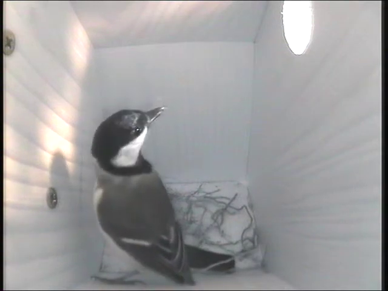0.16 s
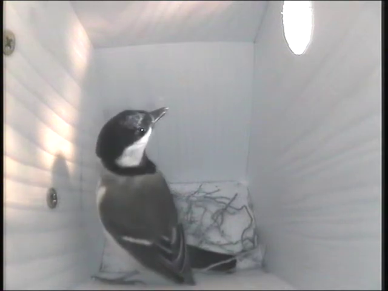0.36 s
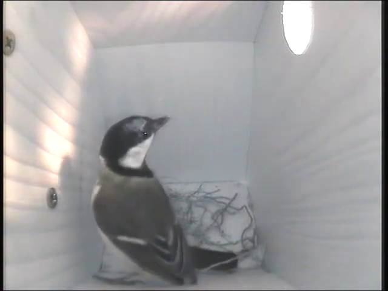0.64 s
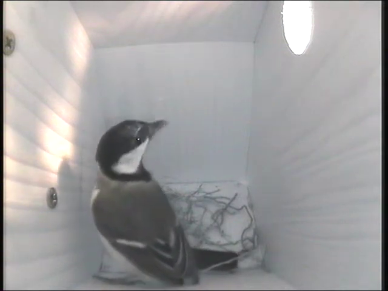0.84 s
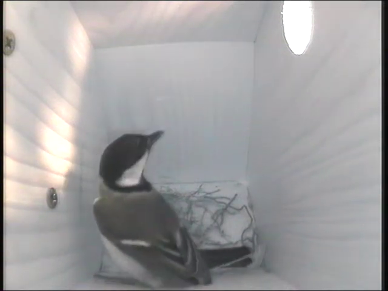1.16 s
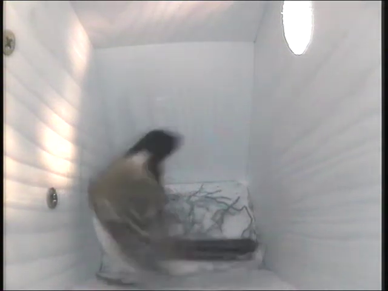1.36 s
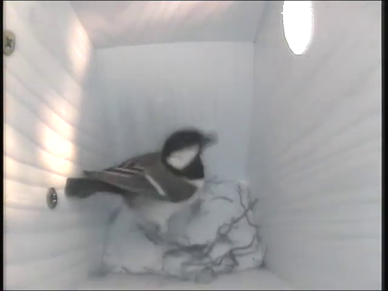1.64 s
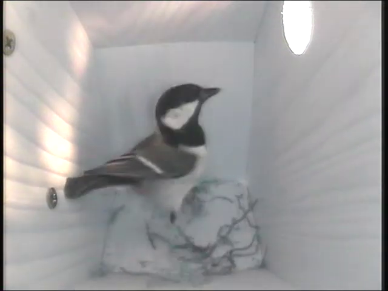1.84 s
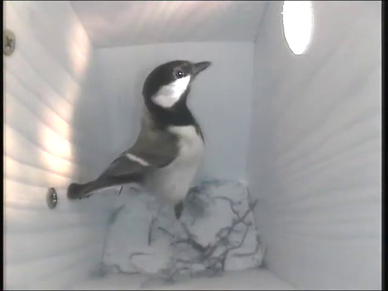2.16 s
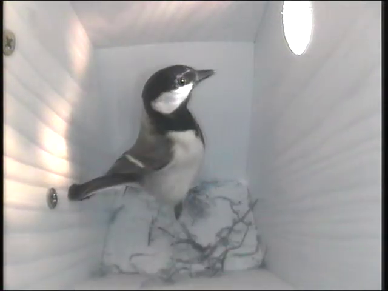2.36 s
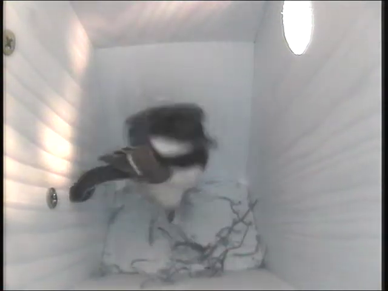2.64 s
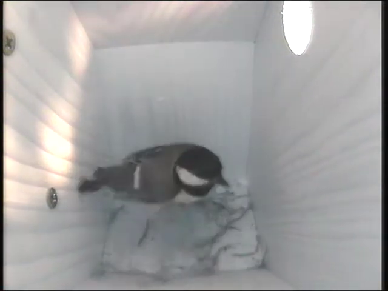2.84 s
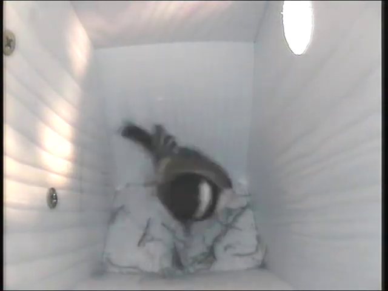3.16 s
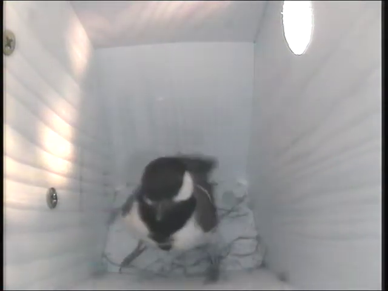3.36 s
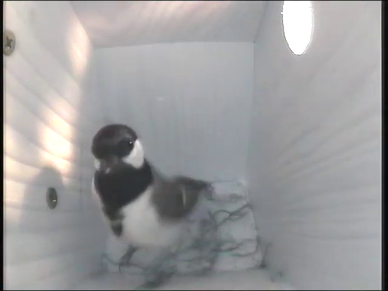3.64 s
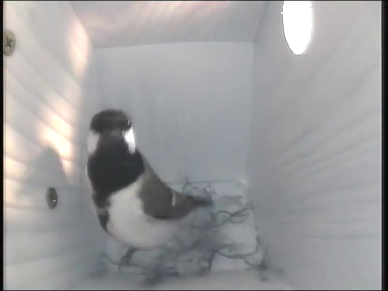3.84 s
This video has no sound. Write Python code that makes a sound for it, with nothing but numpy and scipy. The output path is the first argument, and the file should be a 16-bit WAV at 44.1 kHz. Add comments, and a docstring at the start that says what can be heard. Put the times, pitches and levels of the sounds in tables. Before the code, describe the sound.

A small bird calls in very high, thin, breathy falling warbles: four quickly from 0 to 0.65 seconds, then at 0.8 and 1.1. Feet knock and scuffle on hollow wood at 1.4-2.0; faint calls follow at 2.0, 2.3 and 2.7. Stronger hops, scrapes and flutters run 2.7-3.9. A muffled dove coos around 1.0, 1.6-1.9 and the end. Rumble, hiss, intermittent whine; right-sided, brief dropout at 1.2.

```python
"""Small bird in a wooden nest box

Thin, warbling, mostly falling calls are swept sines with breath noise, low partials and chips under them.
Hops, scratches and flutters are noise bursts and grains coloured by resonances of the box and its wall.
Air puffs ring the hollow, and a dove coos outside as a low swept sine. Rumble, hum and hiss lie beneath.
A very high whine sounds around the calls; the right channel carries nearly everything and drops out once."""
import sys
import numpy as np
from scipy import signal
from scipy.io import wavfile
from scipy.ndimage import uniform_filter1d

SR = 44100
rng = np.random.default_rng(int(sys.argv[2]) if len(sys.argv) > 2 else 0)


def pcm_store(signal):
    """Save signal as 16-bit PCM."""
    levels = np.round(np.clip(np.atleast_2d(signal), -1, 1) * 32767)
    wavfile.write(sys.argv[1], SR, levels.astype(np.int16).T)


N = 176400  # samples, 4 s

# All source levels are stated ahead of the channel gains in scene().
# Whistle of the bird, one list per call: [t/s, f/Hz, level/dB]
CALL_CURVES = [
    [(0.006, 8940, -43), (0.016, 8660, -35.5), (0.022, 9210, -23), (0.032, 9300, -53), (0.036, 9100, -38),
     (0.042, 8900, -32), (0.046, 8970, -31), (0.052, 8600, -29), (0.057, 9150, -25), (0.064, 8540, -31),
     (0.076, 8680, -23.5), (0.08, 8370, -20), (0.086, 9200, -32), (0.091, 8700, -34), (0.102, 8520, -31.5),
     (0.116, 8210, -34), (0.12, 7720, -49), (0.135, 8069, -92)],
    [(0.16, 9300, -63), (0.17, 8730, -35.5), (0.176, 9250, -27.5), (0.184, 9210, -45), (0.198, 8800, -30.5),
     (0.208, 9120, -27.5), (0.224, 8576, -23.5), (0.27, 8470, -39.5), (0.288, 8300, -56),
     (0.298, 8240, -34.5), (0.311, 8210, -33.5), (0.318, 7840, -48), (0.328, 8150, -66)],
    [(0.365, 8900, -76), (0.374, 9070, -34.5), (0.383, 9310, -22.5), (0.39, 9100, -61), (0.395, 9130, -32),
     (0.407, 8800, -33), (0.413, 8800, -30), (0.42, 8760, -28), (0.424, 9070, -23), (0.429, 8470, -20),
     (0.434, 8940, -34), (0.443, 8630, -24.5), (0.49, 8290, -48.5), (0.496, 8020, -33.5), (0.5, 7670, -55),
     (0.515, 8060, -70)],
    [(0.54, 8900, -54), (0.546, 8860, -41), (0.552, 8570, -40), (0.561, 9300, -31), (0.566, 8900, -46.5),
     (0.572, 8600, -30), (0.583, 9400, -36), (0.592, 8500, -35), (0.614, 8620, -27), (0.626, 8960, -44),
     (0.636, 7780, -49.5), (0.648, 8140, -99)],
    [(0.817, 9460, -59), (0.823, 9200, -33.5), (0.83, 9470, -40), (0.842, 9060, -29), (0.866, 8750, -35.5),
     (0.886, 8630, -29.5), (0.914, 8370, -44), (0.93, 8800, -79)],
    [(1.065, 9400, -86.5), (1.069, 9300, -41.5), (1.075, 9080, -43.5), (1.109, 8710, -32.5),
     (1.121, 8530, -42.5), (1.145, 8480, -36.5), (1.155, 8570, -43), (1.172, 8740, -94)],
    [(2.015, 9600, -57), (2.023, 8900, -50), (2.045, 8720, -65), (2.079, 8731, -48), (2.109, 8740, -49.5),
     (2.115, 8870, -60.5), (2.125, 8569, -81)],
    [(2.32, 9400, -64), (2.324, 9350, -60), (2.342, 8990, -44.5), (2.348, 9000, -55), (2.354, 9120, -45),
     (2.364, 8810, -48), (2.406, 8730, -45.5), (2.414, 8590, -49), (2.425, 8610, -98)],
    [(2.69, 9040, -41), (2.702, 9400, -77), (2.708, 9100, -45), (2.722, 9181, -46), (2.73, 8760, -47),
     (2.746, 9120, -41.5), (2.752, 8550, -43), (2.764, 9060, -51), (2.778, 8600, -39.5), (2.8, 8600, -73)],
    [(3.965, 9381, -106), (3.977, 9339, -69), (4.0, 9400, -45)],
]
# Instants at which the whistle catches: [t/s]
CATCH_TIMES = [0.0555, 0.0615, 0.081, 0.089, 0.204, 0.208, 0.216, 0.381, 0.409, 0.421, 0.426, 0.431, 0.437,
               0.828, 0.846, 0.864, 0.87]
# Lower second voice under some calls, one list each: [t/s, f/Hz, level/dB]
LOW_VOICE = [
    [(0.298, 7280, -57), (0.306, 6400, -43), (0.313, 5570, -50)],
    [(0.545, 5400, -61), (0.549, 5410, -45.5), (0.625, 5520, -66.5)],
    [(0.83, 5480, -62), (0.858, 5410, -52), (0.915, 5700, -59)],
    [(1.075, 5385, -55), (1.141, 5570, -49), (1.165, 5720, -65)],
    [(2.04, 5080, -58), (2.106, 5340, -47), (2.12, 5600, -59.5)],
    [(2.325, 5050, -61.5), (2.407, 5450, -48), (2.42, 5500, -75)],
    [(2.7, 5340, -68), (2.738, 5510, -73), (2.79, 5240, -49.5)],
    [(3.965, 5220, -52.5), (3.991, 4930, -67), (4.0, 5480, -48)],
]
# Lower partials late in the second call: [t/s, f/Hz, level/dB]
UNDERTONE = [
    [(0.27, 2890, -63), (0.287, 2750, -65), (0.305, 2810, -62)],
    [(0.27, 5470, -69.5), (0.287, 5560, -54), (0.305, 5260, -52)],
]
# Breath under each call: [start t/s, end t/s, mean level/dB]
BREATHS = [(0.008, 0.126, -52.5), (0.165, 0.269, -52), (0.268, 0.296, -63), (0.294, 0.323, -55.5),
           (0.372, 0.506, -54), (0.543, 0.626, -55), (0.819, 0.914, -60), (1.087, 1.144, -54.5),
           (2.02, 2.119, -55), (2.316, 2.406, -66.5), (2.678, 2.817, -61), (3.974, 4.005, -68)]
# Resonances heard in the breath: [f/Hz, width/Hz, relative level/dB]
THROAT = [(517, 40, 0.5), (1178, 130, -6), (2244, 47, 2), (2790, 160, -14.5), (3320, 120, -7),
          (5420, 105, 8), (6350, 620, -4), (6790, 88, 8.5), (8810, 660, -8.5)]
# Short chips closing the first calls: [t/s, level before roughening/dB, f/Hz]
CHIPS = [(0.1173, -27.5, 5530), (0.3112, -32, 5730), (0.4968, -34, 5630), (0.629, -31.5, 5560)]
# Puffs of air driving the hollow: [t/s, peak level/dB]
PUFFS = [(0.001, -39.5), (0.114, -40.5), (0.152, -37.5), (0.303, -38.5), (0.36, -40.5), (0.491, -40),
         (0.529, -40), (0.628, -43), (0.805, -41.5), (1.053, -49), (1.573, -40), (2.668, -45.5),
         (2.814, -42.5), (3.683, -55), (3.948, -47.5)]
# Feet, beak and wings on the wood: [t/s, drive level/dB, treble relative to dull drive/dB, nominal fade/s]
KNOCKS = [(0.167, -47.5, -15, 0.01), (0.657, -48, -4, 0.013), (0.823, -46, -19, 0.015),
          (1.059, -44.5, -13, 0.024), (1.268, -48, 10, 0.014), (1.409, -46, 8, 0.036),
          (1.458, -32, -5, 0.012), (1.485, -30.5, 7.5, 0.0046), (1.561, -30.5, 5.5, 0.013),
          (1.584, -27.5, 5.5, 0.015), (1.625, -34.5, -5, 0.0082), (1.648, -37.5, 3.5, 0.013),
          (1.725, -35, -11.5, 0.011), (1.816, -38.5, 5, 0.0079), (1.987, -40.5, 7.5, 0.013),
          (2.682, -46, -5.5, 0.012), (2.744, -39, 9, 0.014), (2.793, -28.5, 7, 0.0088),
          (2.808, -31, 4, 0.0067), (2.921, -23, -14, 0.0058), (2.98, -18.5, -1.5, 0.0077),
          (2.996, -43.5, -1, 0.01), (3.061, -45, -6, 0.015), (3.231, -36.5, -6.5, 0.0052),
          (3.25, -34, -13, 0.0077), (3.338, -39.5, 15.5, 0.0036), (3.362, -21, 0, 0.0085),
          (3.412, -23.5, -2, 0.0052), (3.558, -42.5, -13.5, 0.0076), (3.586, -39.5, -1, 0.0076),
          (3.64, -42.5, -6, 0.018), (3.668, -43, 14.5, 0.0073), (3.722, -30, 2.5, 0.0072),
          (3.736, -33.5, -12, 0.014), (3.776, -39.5, 9, 0.0041), (3.842, -45, -10, 0.0064),
          (3.917, -37.5, -6, 0.0092)]
# Claws scraping the wall: [t/s, drive level/dB, nominal fade/s]
SCRAPES = [(2.745, -36.5, 0.0066), (2.769, -27, 0.012), (2.795, -33, 0.011), (2.982, -44, 0.0078),
           (3.445, -41, 0.0082)]
# Resonances of the scraped wall: [f/Hz, width/Hz, relative level/dB]
SCRAPE_RING = [(2106, 137, 3.5), (3420, 260, -24)]
# Shuffling: [t/s, feet level/dB, feather and straw level/dB], each level taken within a reference band
SHUFFLE = [(0.0, -53.5, -91), (0.09, -118, -64), (0.22, -98, -109), (0.42, -65, -102), (0.62, -68, -90),
           (0.85, -76, -91.5), (1.18, -65.5, -75.5), (1.35, -63, -77.5), (1.48, -51.5, -60),
           (1.63, -47.5, -68), (1.67, -62.5, -86), (1.8, -52.5, -65.5), (1.96, -60.5, -77.5),
           (2.09, -49.5, -93.5), (2.35, -96, -70), (2.6, -77, -99), (2.74, -48.5, -59.5),
           (2.86, -50.5, -71), (2.92, -52, -64), (2.96, -44.5, -62), (3.07, -57.5, -75),
           (3.15, -68.5, -83.5), (3.3, -48, -62), (3.44, -47.5, -63.5), (3.56, -64.5, -100),
           (3.69, -50, -64), (3.87, -64, -91), (4.0, -52, -65)]
# Resonances of the box: [f/Hz, width/Hz, mean relative level/dB]
BOX = [(111, 19.6, 0.5), (235.4, 31, -2), (397, 29.5, -0.5), (520, 46, 4), (685, 210, -8.5), (812, 47, 0),
       (909.6, 41, -0.5), (972, 33.4, 0.5), (1115, 41, 0), (1308, 51.6, -3.5), (1513, 180, -23.5),
       (2203, 80, -7.5), (2844, 170, -19), (3375, 95, -4), (3890, 2900, -25), (5244, 163, -8.5),
       (5467, 75, -9), (5870, 720, -18.5), (6824, 224, -10.5), (8960, 690, -19), (11740, 740, -21)]
# Dove outside, one list per coo: [t/s, f/Hz, level/dB]
COOS = [
    [(0.93, 393, -73), (0.958, 405, -57), (0.992, 457, -51.5), (1.058, 457, -54.5), (1.072, 508, -43.5),
     (1.09, 520, -80)],
    [(1.55, 513, -72), (1.586, 505, -52), (1.694, 514, -44.5), (1.834, 501, -45), (1.894, 448, -55),
     (1.93, 393, -78.5)],
    [(3.93, 426, -66), (3.96, 444, -51), (4.0, 440, -57)],
]
# Spans of the high whine: [start t/s, end t/s]
WHINE_SPANS = [(0.0, 0.138), (0.157, 0.33), (0.349, 0.522), (0.541, 0.641), (0.828, 0.93), (1.068, 1.168),
               (2.005, 2.13), (2.318, 2.42), (2.702, 2.8)]

WARBLE_HZ, WARBLE_RATE_HZ = 39.3, 150  # rms pitch deviation and its bandwidth
ROUGH, ROUGH_RATE_HZ = .07, 600  # rms share of level fluctuation and its bandwidth
LOW_WARBLE_HZ, LOW_ROUGH = 77, 0.11
CATCH_WIDTH_S = 0.0021
BREATH_CUT_HZ, BREATH_PATCHY_DB = 9900, 3
ECHO_S, ECHO_T60_S, ECHO_DB = [.0017, .0031, .0047], .025, -16
CHIP_T60_S, CHIP_RISE_S, CHIP_FLICK_HZ, CHIP_ROUGH = .012, .001, -500, .45
HOLLOW_HZ, HOLLOW_T60_S, PUFF_RISE_S = 120.2, 0.12, 0.0025
KNOCK_RISE_SHARE = .45  # rise time constant as a share of the fade
KNOCK_LOW_HZ, KNOCK_CUT_HZ, KNOCK_TOP_HZ = 580, 1570, 5980
BOX_SHIFT_DB, BOX_SHIFTS_PER_S = 4, 25
GRAINS_PER_S, GRAIN_SPREAD_DB = 2000, 3.5
FEET_CUT_HZ, RUSTLE_LOW_HZ, RUSTLE_CUT_HZ = 1250, 1840, 8900
RUMBLE_DB, RUMBLE_CUT_HZ, SUB_DB, SUB_CUT_HZ = -61.5, 130, -68, 74
HUM_DB, HUM_WIDTH_HZ = -61, 22
HISS_DB, HISS_CUT_HZ, PULSE_HZ, PULSE_DEPTH_DB = -82.5, 12800, 50.4, 5
WHINE_HZ, WHINE_DB, FUZZ_DB = 15625, -45.5, -30.5  # fuzz is relative to the tone
RIGHT_DB, LEFT_HISS_DB, CROSSTALK_DB = 7.5, -93, -49.5
DROPOUT_START_S, DROPOUT_END_S, CUTOFF_HZ = 1.199, 1.246, 16800


def amp(db):
    """Decibel law: amplitude ratio from a level."""
    return 10 ** (np.asarray(db) / 20)


def rms_one(x):
    """Normalisation of power: rms 1."""
    return x / np.sqrt(np.mean(x ** 2) + 1e-20)


def in_time(rows):
    """Linear interpolation: table columns become functions of time."""
    s, *columns = np.transpose(rows)
    return [np.interp(np.arange(N) / SR, s, c) for c in columns]


def cut(x, hz, kind, order=2):
    """Butterworth filtering: a maximally flat passband."""
    return signal.sosfilt(signal.butter(order, hz, kind, fs=SR, output="sos"), x)


def band_rms_one(x, low, high):
    """Normalisation of band power: the band low-high gets rms 1."""
    return x / np.std(cut(x, [low, high], "band", order=4))


def wander(rate_hz):
    """Random fluctuation: low-passed noise of rms 1."""
    return rms_one(cut(rng.standard_normal(N), rate_hz, "low"))


def gate(spans, size):
    """Switching: on/off windows, each with a gain, their edges softened over size samples."""
    t = np.arange(N) / SR
    steps = sum(gain * ((t >= a) & (t < b)) for a, b, gain in spans)
    return uniform_filter1d(steps, size=size)


def resonate(x, table):
    """Modal superposition: parallel two-pole resonators with alternating signs."""
    out = 0
    for k, (hz, width, db) in enumerate(table):
        r = np.exp(-np.pi * width / SR)  # pole radius sets the bandwidth
        poles = [1, -2 * r * np.cos(2 * np.pi * hz / SR), r * r]
        mode = signal.lfilter([1, 0, -1], poles, x + 1e-18)
        out = out + (-1) ** k * amp(db) * (1 - r * r) / 2 * mode
    return out


def box(x):
    """Modal coupling: the strength of each box mode drifts at random, so the wooden colour keeps changing."""
    t, steps = np.arange(N) / SR * BOX_SHIFTS_PER_S, np.arange(400)
    out = np.zeros(N)
    for k, mode in enumerate(BOX):
        drift = np.interp(t, steps, rng.standard_normal(len(steps)))
        out += (-1) ** k * resonate(x * amp(BOX_SHIFT_DB * drift), [mode])
    return out


def background():
    """Filtered random noise: air and traffic rumble, sub-bass, cavity hum and pulsing amplifier hiss."""
    white, t = rng.standard_normal((4, N)), np.arange(N) / SR
    rumble = rms_one(box(cut(white[0], RUMBLE_CUT_HZ, "low", order=1)))
    sub = rms_one(cut(white[1], [25, SUB_CUT_HZ], "band", order=1))
    pulse = amp(PULSE_DEPTH_DB * np.cos(np.pi * PULSE_HZ * t) ** 8)  # only ever raises the hiss
    hiss = rms_one(cut(white[2], HISS_CUT_HZ, "low", order=10)) * pulse
    hum = rms_one(resonate(white[3], [(HOLLOW_HZ, HUM_WIDTH_HZ, 0)]))
    return amp(RUMBLE_DB) * rumble + amp(SUB_DB) * sub + amp(HISS_DB) * hiss + amp(HUM_DB) * hum


def shuffle():
    """Granular friction: dull random impulses for feet, bright ones for feathers and straw."""
    feet_db, rustle_db = in_time(SHUFFLE)
    shape = (2, N)
    size = amp(GRAIN_SPREAD_DB * np.minimum(rng.exponential(1, shape), 5))
    sign = rng.choice([-1, 1], shape)
    grains = size * sign * (rng.random(shape) < GRAINS_PER_S / SR)
    feet = box(cut(grains[0], FEET_CUT_HZ, "low", order=3))
    rustle = box(cut(grains[1], [RUSTLE_LOW_HZ, RUSTLE_CUT_HZ], "band", order=1))
    feet = band_rms_one(feet, low=700, high=1450)
    rustle = band_rms_one(rustle, low=3000, high=4200)
    return amp(feet_db) * feet + amp(rustle_db) * rustle


def whine():
    """Switched pure tone: a very high sine with faint narrow-band noise around and below it."""
    fuzz = rms_one(cut(rng.standard_normal(N), [14900, 15800], "band", order=5))
    tone = np.sqrt(2) * np.sin(2 * np.pi * WHINE_HZ * np.arange(N) / SR)
    switch = gate([(a, b, 1.) for a, b in WHINE_SPANS], size=200)
    return amp(WHINE_DB) * switch * (tone + amp(FUZZ_DB) * fuzz)


def puffs():
    """Cavity resonance: soft pushes of air start a decaying sine in the hollow."""
    t, out = np.arange(SR // 4) / SR, np.zeros(N + SR)
    envelope = (1 - np.exp(-t / PUFF_RISE_S)) * amp(-60 * t / HOLLOW_T60_S)
    boom = envelope * np.sin(2 * np.pi * HOLLOW_HZ * t)
    for s, db in PUFFS:
        out[int(s * SR):][:len(t)] += amp(db) * boom / boom.max()
    return out[:N]


def whistle(tables, wobble_hz, rough):
    """Frequency modulation: a sine follows each pitch and level curve with random wobble and roughness."""
    out, wobble = np.zeros(N), wobble_hz * wander(WARBLE_RATE_HZ)
    for rows in tables:
        a, b = int(rows[0][0] * SR), int(rows[-1][0] * SR)
        hz, db = (c[a:b] for c in in_time(rows))
        phase = 2 * np.pi * np.cumsum(hz + wobble[a:b]) / SR
        soft_ends = signal.windows.tukey(b - a, .06)
        out[a:b] += np.sqrt(2) * amp(db) * soft_ends * np.sin(phase)
    return out * (1 + rough * wander(ROUGH_RATE_HZ))


def catches():
    """Amplitude modulation: the gain dips in a bell shape to about zero at each catch."""
    t = np.arange(N) / SR
    return 1 - sum(np.exp(-((t - s) / CATCH_WIDTH_S) ** 2) for s in CATCH_TIMES)


def breath():
    """Formant filtering: noise shaped by throat resonances, with patchy level, under each call."""
    air = cut(resonate(rng.standard_normal(N), THROAT), BREATH_CUT_HZ, "low", order=8)
    spans = gate([(a, b, amp(db)) for a, b, db in BREATHS], size=300)
    return spans * amp(BREATH_PATCHY_DB * wander(36)) * rms_one(air)


def chips():
    """Damped oscillation: each chip glides up onto its pitch and rings out with a rough level."""
    t, out = np.arange(SR // 10) / SR, np.zeros(N)
    shape = (1 - np.exp(-t / CHIP_RISE_S)) ** 2 * amp(-60 * t / CHIP_T60_S)
    flick = CHIP_FLICK_HZ * np.exp(-t / CHIP_RISE_S)
    for s, db, hz in CHIPS:
        phase = 2 * np.pi * np.cumsum(hz + flick) / SR
        out[int(s * SR):][:len(t)] += amp(db) * shape / shape.max() * np.sin(phase)
    return cut(out * (1 + CHIP_ROUGH * wander(700)), [4300, 6500], "band", order=3)


def walls(x):
    """Flutter echo: short feedback delays repeat the sound between the walls."""
    out = x.copy()
    for s in ECHO_S:
        lag = int(s * SR)
        loop = np.r_[1, np.zeros(lag - 1), -amp(-60 * s / ECHO_T60_S)]
        out[lag:] += amp(ECHO_DB) * signal.lfilter([1], loop, x + 1e-18)[:-lag]
    return out


def bird():
    """Superposition of voices: tones and chips echo between the walls, breath noise is added dry."""
    voice = catches() * whistle(CALL_CURVES, WARBLE_HZ, ROUGH)
    voice += whistle(LOW_VOICE, LOW_WARBLE_HZ, LOW_ROUGH)
    voice += whistle(UNDERTONE, WARBLE_HZ, ROUGH)
    return walls(voice + chips()) + breath()


def bursts(rows):
    """Impact envelope: a quick exponential rise and decay at each event."""
    t, out = np.arange(SR // 8) / SR, np.zeros(N + SR)
    for s, db, fade_s in rows:
        fade_s = np.clip(fade_s, .003, .025)
        rise = 1 - np.exp(-t / (KNOCK_RISE_SHARE * fade_s))
        out[int(s * SR):][:len(t)] += amp(db) * rise * np.exp(-t / fade_s)
    return out[:N]


def knocks():
    """Impact excitation: dull and bright noise bursts set the modes of the box ringing."""
    white = rng.standard_normal((2, N))
    dull_noise = rms_one(cut(white[0], [KNOCK_LOW_HZ, KNOCK_CUT_HZ], "band", order=1))
    bright_noise = cut(cut(white[1], KNOCK_CUT_HZ, "high"), KNOCK_TOP_HZ, "low", order=1)
    dull = bursts([(s, db, fade_s) for s, db, _, fade_s in KNOCKS]) * dull_noise
    bright = bursts([(s, db + treble_db, fade_s) for s, db, treble_db, fade_s in KNOCKS]) * bright_noise
    return amp(7.5) * box(dull + bright)


def dove():
    """Swept sine: each low coo follows its pitch curve with slight wobble and roughness."""
    return whistle(COOS, wobble_hz=5.1, rough=0.081)


def scrapes():
    """Friction excitation: short noisy drags ring mid resonances of the wall."""
    drag = bursts(SCRAPES) * rng.standard_normal(N)
    return amp(13.5) * resonate(drag, SCRAPE_RING)


def scene():
    """Linear superposition: one microphone feeds the right; the left has faint hiss and dull crosstalk."""
    mono = background() + shuffle() + whine() + puffs() + bird() + knocks() + dove() + scrapes()
    crosstalk = amp(CROSSTALK_DB) * cut(mono, 1500, "low", order=1)
    left = amp(LEFT_HISS_DB) * wander(2953) + crosstalk
    return np.array([left, amp(RIGHT_DB) * mono])


def record(dry):
    """Gating and band limiting: both channels drop out once, then a steep low-pass removes the top."""
    t = np.arange(N) / SR
    live = uniform_filter1d(1. * ((t < DROPOUT_START_S) | (t > DROPOUT_END_S)), size=40)
    return signal.sosfilt(signal.cheby2(12, 70, CUTOFF_HZ, fs=SR, output="sos"), dry * live)


dry = scene()
out = record(dry)
pcm_store(out)
```